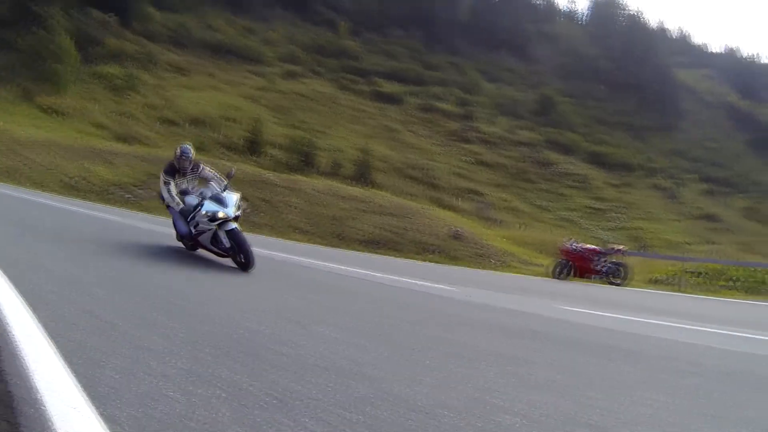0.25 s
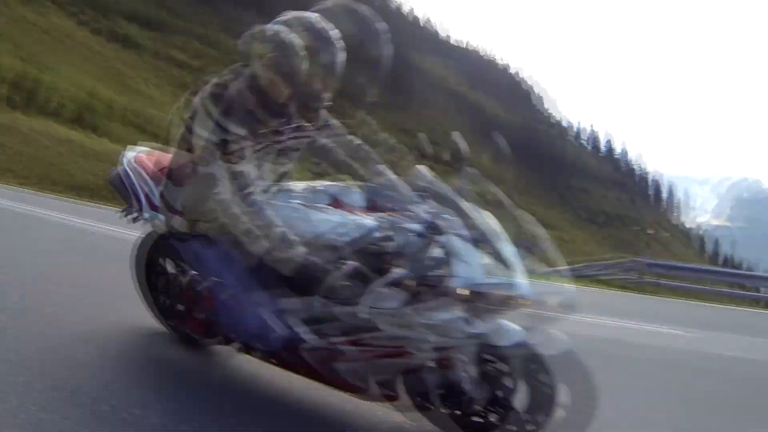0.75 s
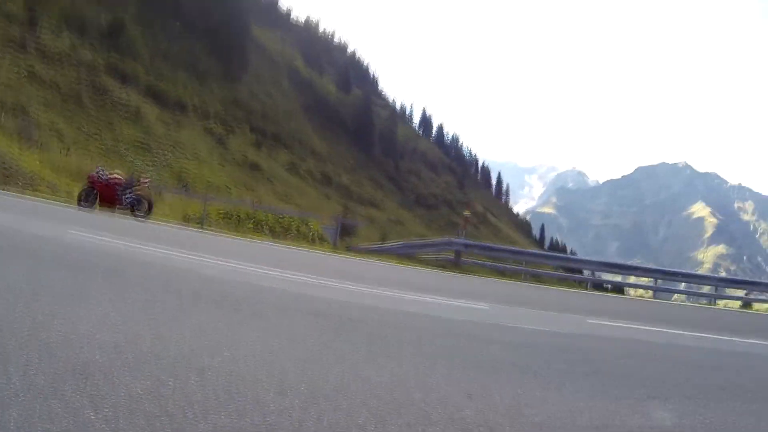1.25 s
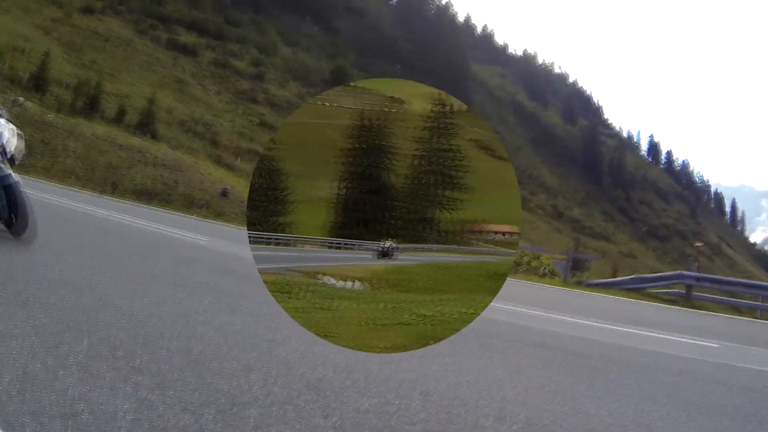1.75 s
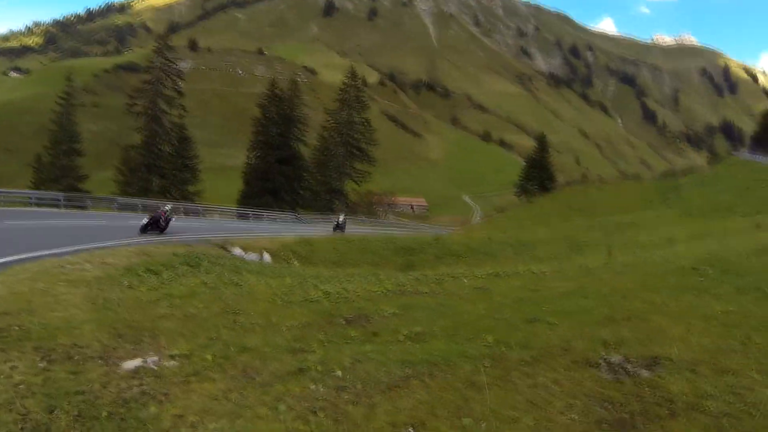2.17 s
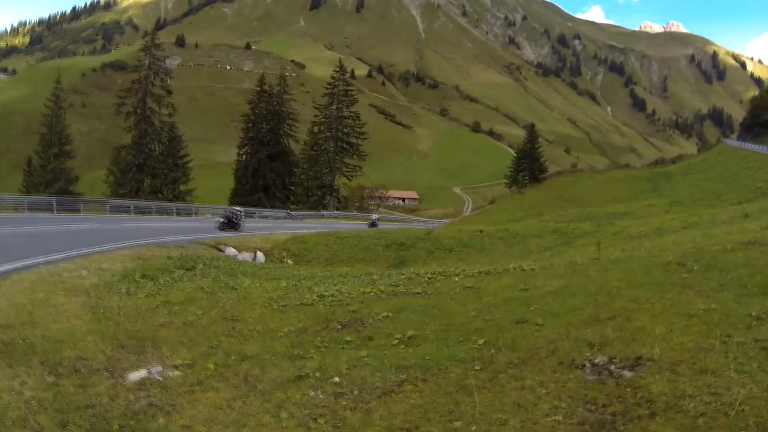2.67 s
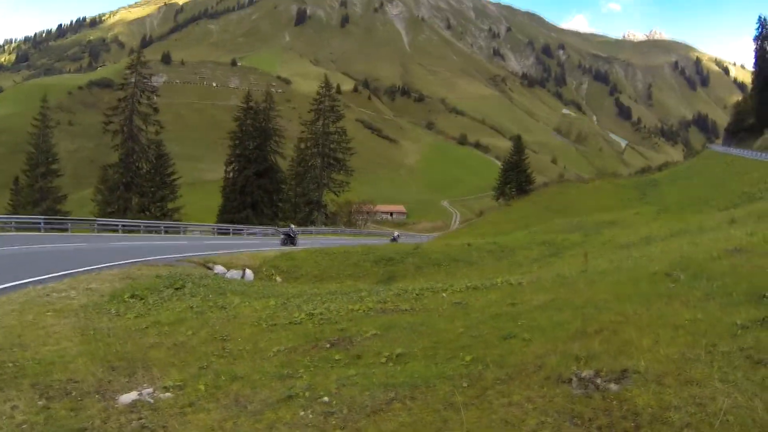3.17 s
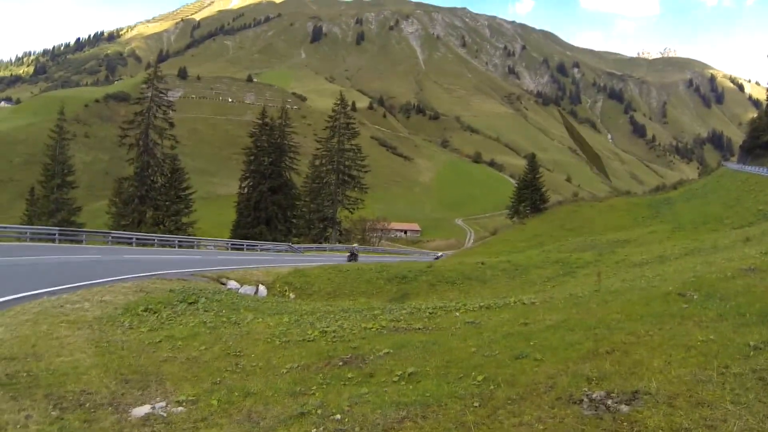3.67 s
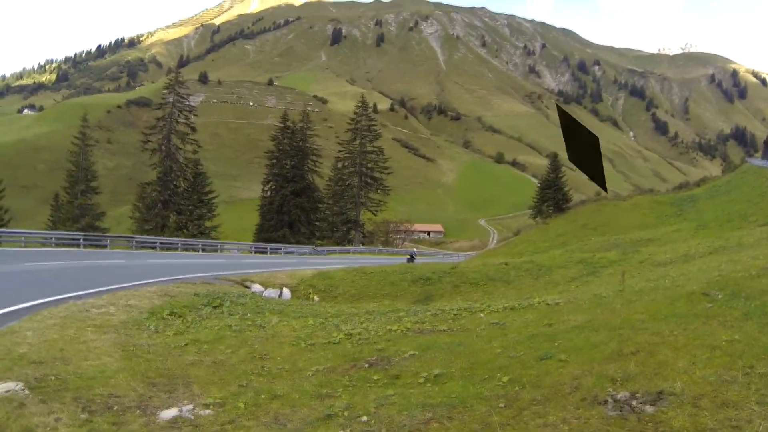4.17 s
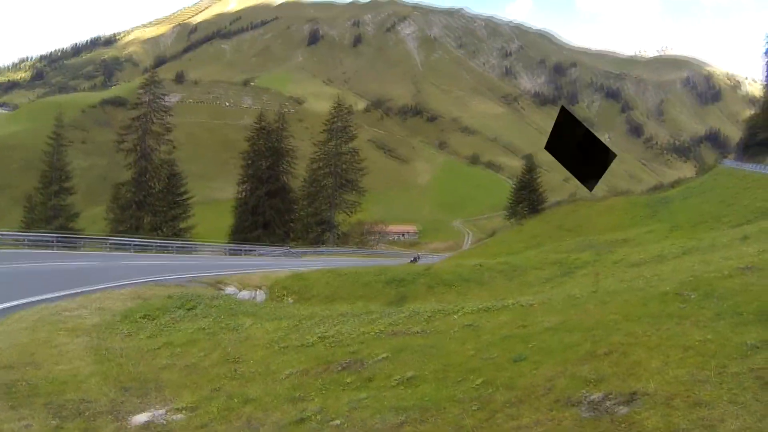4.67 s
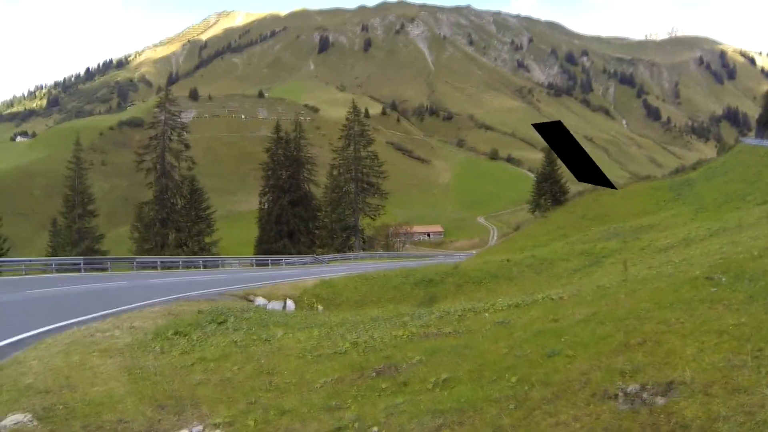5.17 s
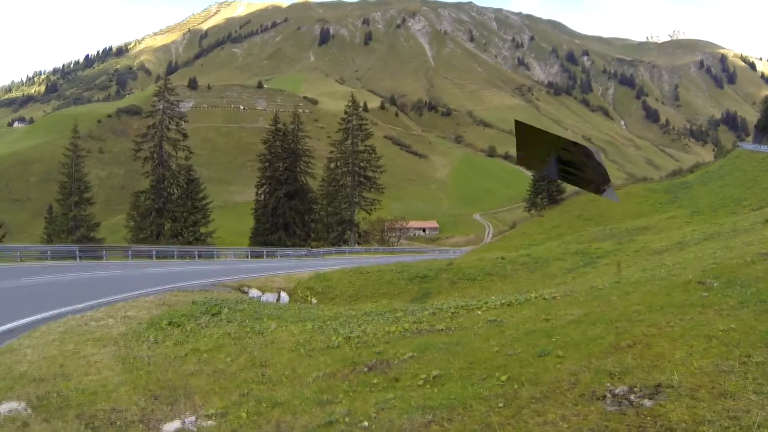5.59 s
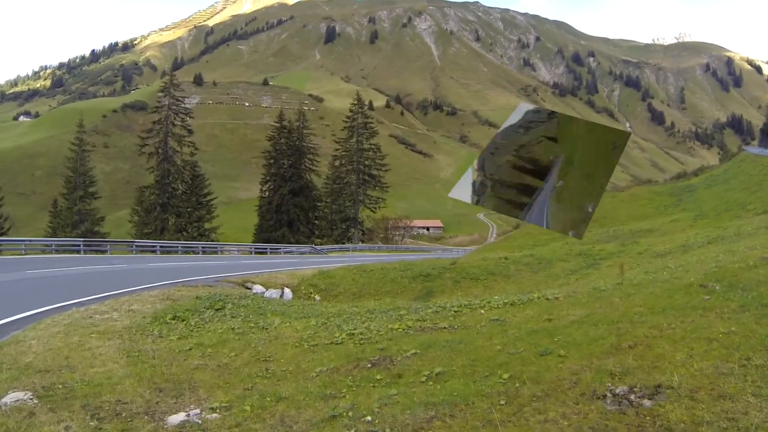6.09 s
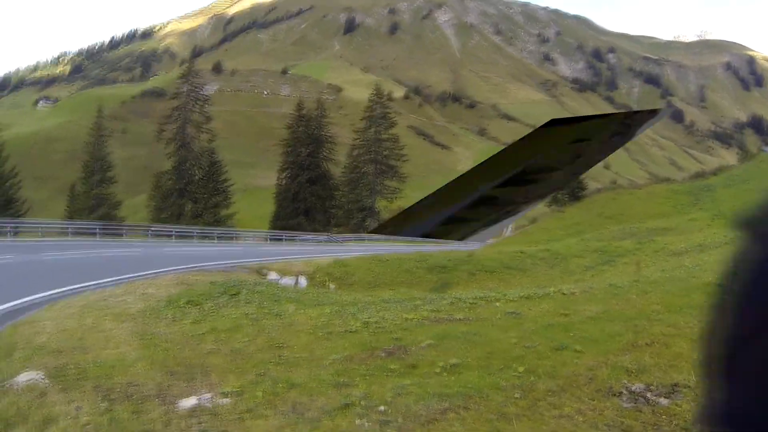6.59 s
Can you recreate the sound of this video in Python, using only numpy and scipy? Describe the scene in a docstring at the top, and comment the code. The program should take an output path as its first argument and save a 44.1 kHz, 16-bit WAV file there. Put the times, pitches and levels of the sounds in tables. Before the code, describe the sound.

Wind buffets a close, muffled outdoor microphone while uneven motorcycle exhausts approach and pass within a second. Short hissing gusts scrape over the case. After two seconds the bike accelerates away in a clean rising hum, dropping sharply in level past three seconds. Busy plastic rubs, creaks, clicks and deep thumps follow, then quiet fast camera ticking, and a final burst of loud handling.

```python
"""Two motorcycles on a mountain road

Two sport motorcycles lean past a small camera and pull away uphill: sums of firing harmonics and shaped noise.
Slow turbulent noise buffets the microphone; gusts, rubs, creaks and clicks excite the resonant plastic case.
Bumps swing the diaphragm, and faint ticks and a whistle of the camera lie over still background noise."""
import sys
import numpy as np
from scipy import signal
from scipy.fft import rfft, irfft
from scipy.io import wavfile
from scipy.ndimage import uniform_filter1d

SR = 44100
rng = np.random.default_rng(int(sys.argv[2]) if len(sys.argv) > 2 else 0)


def dump(signal):
    """Clip the signal to [-1, 1] and save it as 16-bit WAV at the path in sys.argv[1]."""
    limited = np.clip(np.atleast_2d(signal).T, -1, 1)
    pcm = np.round(limited * 32767).astype(np.int16)
    wavfile.write(sys.argv[1], SR, pcm)


N = 301644
TIME = np.arange(N) / SR  # seconds


def amp(db):
    """Logarithmic level: decibels become an amplitude gain."""
    return 10 ** (np.asarray(db) / 20)


def unit(x):
    """Power normalization: scales a signal to rms 1."""
    return x / np.sqrt(np.mean(x ** 2) + 1e-20)


def read(points, hz):
    """Spectral envelope: levels in dB are joined on a log-frequency axis."""
    point_hz, db = np.transpose(points)
    return np.interp(np.log(hz + 1), np.log(point_hz + 1), db)


def follow(rows):
    """Linear interpolation: each column after the time, at every sample."""
    s, *columns = np.transpose(rows)
    return [np.interp(TIME, s, column) for column in columns]


def add(mix, s, sound):
    """Superposition: adds a sound to the mix from time s."""
    part = mix[max(round(s * SR), 0):][:len(sound)]
    part += sound[:len(part)]


def noise(colour):
    """Spectral shaping: white noise takes the given envelope, at rms 1."""
    spectrum = rfft(rng.standard_normal(N))
    hz = np.fft.rfftfreq(N, 1 / SR)
    return unit(irfft(spectrum * amp(read(colour, hz)), N))


def wander(hz):
    """Low-pass random drift: noise of rms 1 that weakens steeply above hz."""
    spectrum = rfft(rng.standard_normal(N))
    lowpass = 1 / (1 + (np.fft.rfftfreq(N, 1 / SR) / hz) ** 4)
    return unit(irfft(spectrum * lowpass, N))


# Still background air. Each row: frequency in Hz, relative level in dB.
AIR_COLOUR = [(88, -22), (150, -5.5), (234, -11), (505, -16.5), (687, -17), (1130, -22.5), (1350, -11),
              (2180, -29.5), (2360, -23), (2750, -29), (3090, -29), (6940, -39), (7940, -34.5),
              (8580, -39.5), (15000, -42)]
AIR_DB = -59.5


def still_air():
    """Stationary ambience: steady noise with a fixed spectrum."""
    return amp(AIR_DB) * noise(AIR_COLOUR)


TICK_HZ, TICK_START_S = 30.15, 5.4655


def camera():
    """Periodic excitation: soft noise bursts swell from 4.6 to 5.4 s and stay there; a thin whistle is steady."""
    tick_s, uneven_db = .003, 1.5
    tick_db = np.interp(TIME, [4.6, 5.4], [-73, -65.5])
    age = (TIME - TICK_START_S + tick_s / 2) % (1 / TICK_HZ)
    colour = [(300, -20), (700, -7), (1050, -14), (1400, 0), (1750, -7), (2050, -3),
              (3200, -11), (7000, -28), (15000, -44)]  # (Hz, dB)
    burst = age * np.exp(-age / tick_s)
    ticks = unit(noise(colour) * burst * amp(uneven_db * wander(45)))
    whistle = np.sqrt(2) * amp(-84) * np.sin(2 * np.pi * 7672 * TIME)
    return amp(tick_db) * ticks + whistle


# Wind on the microphone. Each row: time in seconds, level in dB before the trim and the gust lift.
WIND_LEVELS = [(0, -22.5), (.4, -14.5), (.55, -18), (1.15, -19.5), (1.55, -22.5), (1.73, -9), (1.83, -21.5),
               (2.15, -19), (2.95, -25), (3.15, -22), (4.08, -22.5), (4.4, -10.5), (4.55, -20.5),
               (5.28, -28), (5.4, -32.5), (6.34, -38), (6.7, -16)]
# Spectrum of the eddies. Each row: frequency in Hz, relative level in dB.
WIND_COLOUR = [(5, 11.5), (14, 10.5), (28, 0), (45, -3.5), (70, -12), (110, -20.5), (200, -38.5),
               (350, -43), (700, -71), (1500, -86.5)]
GUST_LIFT_DB, GUST_LIFT_S = 11.5, 0.056  # swell around the strongest gust, and its half-width


def wind(trim_db=-2):
    """Turbulent pressure: slow swings at the microphone port swell around each gust."""
    eddies = noise(WIND_COLOUR)
    eddies = eddies / np.sqrt(uniform_filter1d(eddies ** 2, size=5000) + 0.025)  # evens the loudness
    strongest_db = max(row[2] for row in GUST_STROKES)
    gusting = np.zeros(N)
    for start, end, first_db, *_ in GUST_STROKES:
        middle = (start + end) / 2
        gusting += amp(first_db - strongest_db) * np.exp(-((TIME - middle) / GUST_LIFT_S) ** 2)
    return amp(follow(WIND_LEVELS)[0] + trim_db + GUST_LIFT_DB * gusting) * eddies


# Response of the case to friction and taps. Each row: frequency in Hz, relative level in dB.
CASE_RESPONSE = [(150, -8), (500, -20.5), (730, -15), (930, -18.5), (1280, 0), (1750, -3.5), (2300, -11),
                 (2800, -10), (3600, -9.5), (4300, -21.5), (5100, -18), (5750, -29), (6500, -22.5),
                 (8800, -32.5), (14500, -30)]


def case_ring(cavity_hz, cavity_db, body_db, treble_db, fizz_db, width_hz=220, size=1024):
    """Minimum-phase resonance: a causal case response whose cavity peak and brightness follow the grip."""
    hz = abs(np.fft.fftfreq(size, 1 / SR))
    db = read(CASE_RESPONSE, hz) + cavity_db / (1 + ((hz - cavity_hz) / width_hz) ** 2)
    tilt = [(750, body_db), (1200, 0), (2100, 0.0065), (3200, treble_db), (6500, treble_db),
            (10000, fizz_db), (15000, fizz_db - 6.0)]  # (Hz, dB)
    db += read(tilt, hz)
    minimum_phase = np.exp(np.conj(signal.hilbert(np.log(amp(db)))))
    return np.fft.ifft(minimum_phase).real[:size // 2]


BODY_PER_BRIGHT, FIZZ_PER_BRIGHT = 0.05, 1.25  # shares of the treble lift, dB per dB


def touched(grip, bright_db):
    """Contact stiffness: a harder contact rings the case more brightly."""
    cavity_hz, cavity_db, body_db, treble_db, fizz_db = grip
    body_db = body_db + BODY_PER_BRIGHT * bright_db
    fizz_db = fizz_db + FIZZ_PER_BRIGHT * bright_db
    return case_ring(cavity_hz, cavity_db, body_db, treble_db + bright_db, fizz_db)


def friction(rows, grip, attack_s, softness, trim_db, grain_db, slip_db, slip_hz):
    """Granular friction: tiny impacts bunched into uneven slips ring the case; longer strokes end more softly."""
    slips = slip_db * np.tanh(wander(slip_hz))
    grains = rng.standard_normal(N) * amp(grain_db * wander(2000) + slips)
    out = np.zeros(N)
    for start, end, first_db, last_db, bright_db in rows:
        release_s = softness * (end - start)
        t = TIME[(TIME > start - attack_s) & (TIME < end + release_s)]
        if len(t):
            edges = np.minimum((t - start) / attack_s, (end - t) / release_s)
            gate = np.clip(edges / 2 + .5, 0, 1)
            drive = grains[round(t[0] * SR):][:len(t)]
            stroke = signal.fftconvolve(drive, touched(grip, bright_db))[:len(t)]
            level = amp(np.interp(t, [start, end], [first_db, last_db]))
            add(out, t[0], unit(stroke) * gate * level)
    return amp(trim_db) * out


# Gusts over the case. Each row: start and end in seconds, first and last level in dB before the trim,
# brightness in dB.
GUST_STROKES = [(0.313, 0.361, -33, -36.5, -7), (0.406, 0.48, -43, -41.5, -13),
                (0.521, 0.564, -36.5, -35, -6.5), (0.603, 0.65, -44, -31, -2.5),
                (1.362, 1.408, -24.5, -43, 2), (1.455, 1.505, -35.5, -35.5, -2),
                (1.591, 1.617, -31.5, -33.5, -3.5)]
# How gusts colour the case. The values: cavity in Hz, then cavity, body, treble and fizz in dB.
GUST_GRIP = (1346, 14.3, 11.3, 2.6, 2)
PORT_HZ, PORT_Q, PORT_DB = 2800, 8.2, 9  # resonance of the microphone port


def gusts():
    """Flow-excited resonance: gusts hiss over the case and blow across the microphone port."""
    hiss = friction(GUST_STROKES, GUST_GRIP, attack_s=0.015, softness=0.23, trim_db=-1.0,
                    grain_db=-3, slip_db=2.0, slip_hz=90)
    port = signal.lfilter(*signal.iirpeak(PORT_HZ, PORT_Q, fs=SR), hiss)
    return hiss + amp(PORT_DB) * port


# Fingers sliding on the case. Each row: start and end in seconds, first and last level in dB before the trim,
# brightness in dB.
RUB_STROKES = [(2.896, 3.14, -29.5, -43.5, 3.5), (3.556, 3.661, -36, -35, 1),
               (4.146, 4.188, -30.5, -26, -0.5), (4.187, 4.22, -23.5, -28, 8.5),
               (4.243, 4.272, -28, -16, -2), (4.272, 4.295, -40, -36, -6), (4.319, 4.366, -33, -37, -5.5),
               (4.41, 4.472, -34, -35, 3), (4.495, 4.62, -32.5, -31, -2), (4.635, 4.77, -36.5, -49.5, -1.5),
               (4.835, 4.872, -31.5, -38, -8), (4.872, 4.918, -28, -41.5, 3.5),
               (4.932, 4.985, -35.5, -42, -2.5), (5.147, 5.19, -31, -37, -3),
               (5.3, 5.44, -47.5, -51.5, -2.5), (6.36, 6.392, -45, -40.5, 0), (6.472, 6.55, -35, -31.5, 2),
               (6.55, 6.665, -37.5, -38, -1), (6.689, 6.735, -45, -38, 1), (6.75, 6.842, -33, -31.5, 2.5)]
# How fingers colour the case. The values: cavity in Hz, then cavity, body, treble and fizz in dB.
RUB_GRIP = (1451, 6, 7.5, -1.5, -3.5)


def rubs():
    """Sliding friction: fingers rub the plastic in short granular strokes."""
    return friction(RUB_STROKES, RUB_GRIP, attack_s=0.0061, softness=0.22, trim_db=-3.5,
                    grain_db=2.5, slip_db=2.0, slip_hz=160)


# Plastic creaking under a tight grip. Each row: start and end in seconds, first and last drive level in dB
# before the trim, cavity in Hz, shell ring in dB relative to the case response.
CREAK_STROKES = [(4.972, 5.106, -24.5, -31, 2200, -40), (5.127, 5.148, -28, -29, 2200, -46),
                 (6.387, 6.458, -30, -14, 1605, -26)]
# How a creak colours the case. The values: cavity, body, treble and fizz in dB.
CREAK_GRIP = (9, -6, -8.5, -14)
SLIPS_PER_S, SHELL_HZ, SHELL_WIDTH_HZ = 270, 6300, 150  # mean slip rate; high mode of the shell


def creaks(trim_db=0.5, uneven=0.56, sliding=0.76, slip_length=0.43, softness=0.39):
    """Stick-slip: quick uneven jerks of the plastic ring the cavity and one high mode of the shell."""
    turns = np.cumsum(SLIPS_PER_S * (1 + uneven * wander(150))) / SR
    jerks = rng.standard_normal(N) * (sliding + np.exp(-(turns % 1) / slip_length))
    band_hz = SHELL_HZ + SHELL_WIDTH_HZ * np.array([-.5, .5])
    shell = signal.butter(2, band_hz, "bandpass", fs=SR)
    out = np.zeros(N)
    for start, end, first_db, last_db, cavity_hz, ring_db in CREAK_STROKES:
        drive = unit(jerks[round(start * SR):round(end * SR)])
        level = amp(np.linspace(first_db, last_db, len(drive)))
        drive = drive * signal.windows.tukey(len(drive), softness) * level
        case = case_ring(cavity_hz, *CREAK_GRIP)
        ring = signal.lfilter(*shell, signal.unit_impulse(len(case)))
        response = case / np.linalg.norm(case) + amp(ring_db) * ring / np.linalg.norm(ring)
        add(out, start, signal.fftconvolve(drive, response))
    return amp(trim_db) * out


# Plastic snapping and being tapped. Each row: time in seconds, peak level in dB, cavity in Hz, then body,
# treble and fizz in dB.
CLICK_EVENTS = [(2.7814, -12.5, 1440, 0.5, -10, -14), (3.5544, -10, 870, 4.5, -16, -22),
                (4.1381, -21.5, 1254, 12, 10, 10), (4.149, -18.5, 1320, 10, 0, -4),
                (4.19, -6.5, 1200, -12, -1, -9), (4.2428, -11.5, 1450, 10, -17, -18),
                (4.3473, -15.5, 1630, 4, -24, -21), (4.5947, -15.5, 1570, 13.5, -15, -9),
                (4.829, -15.5, 1350, 6, 6, -6), (5.1397, -11, 2020, -22, -17, -26),
                (5.2366, -11, 1620, -10.5, -4, -19.5), (6.3469, -14.5, 1450, 5.5, 2, -26),
                (6.392, -14.5, 1250, 5, -26, -23), (6.496, -20, 1560, -4, -20, -8),
                (6.6087, -16, 1218, 6, -11.5, -4), (6.6901, -23.5, 1360, 8, -12, -9),
                (6.7283, -23, 1480, 19, -12, -15), (6.7682, -7.5, 1230, -4, 6.5, -2),
                (6.812, 1, 1360, 4.5, 5.5, -10), (6.815, -10.5, 1470, 12, -3, -4)]
CLICK_CAVITY_DB = 9.5


def clicks(chatter=0.33, chatter_s=0.0012):
    """Impulse response: one sharp snap and a millisecond of chatter ring the case."""
    out, t = np.zeros(N), np.arange(512) / SR
    for s, peak_db, cavity_hz, *colour in CLICK_EVENTS:
        blow = (t == 0) + chatter * rng.standard_normal(len(t)) * np.exp(-t / chatter_s)
        snap = signal.fftconvolve(blow, case_ring(cavity_hz, CLICK_CAVITY_DB, *colour))
        add(out, s, amp(peak_db) * snap / abs(snap).max())
    return out


# Bumps that push air on the diaphragm. Each row: time in seconds, push in dB before its envelope,
# initial swing rate in Hz, thud peak in dB.
BUMP_EVENTS = [(0.26, -7.5, 82, -24), (0.275, -10, 37.2, -52), (2.047, -18.5, 96, -17),
               (2.896, -11.5, 64.5, -17.5), (3.554, -6, 49, -9), (4.143, -4, 36, -37),
               (4.188, -1, 42.5, -7), (4.239, -2, 34.7, -22), (4.27, -4, 25.6, -37),
               (4.597, -26, 63.5, -18), (4.879, -9, 39.4, -45), (5.128, -40, 90, -21),
               (5.242, -17.5, 25.8, -32), (6.446, -15, 60.5, -26), (6.608, -.5, 42, -15),
               (6.763, -8, 25, -40), (6.812, -16.5, 40, -35)]
THUD_S = 0.0034


def bumps(cycles=1.0, sag=0.41):
    """Damped oscillation: a dull thud and a push of air swing the diaphragm, slowing as it settles."""
    out, t = np.zeros(N), np.arange(SR // 4) / SR
    u = 2 * t / THUD_S
    thud = u ** 2 * (1 - u / 3) * np.exp(-u)
    for s, push_db, hz, thud_db in BUMP_EVENTS:
        swings = np.log1p(sag * hz * t) / sag  # cycles elapsed, ever more slowly
        envelope = np.exp(-(swings / cycles) ** 2) * (1 - np.exp(-t / THUD_S))
        push = np.sin(2 * np.pi * swings) * envelope
        add(out, s, amp(push_db) * push + amp(thud_db) * thud / thud.max())
    return out


PULL_START_S, PULL_END_S, THROTTLE_S = 2.0, 3.15, 0.14  # pull uphill, and length of each transition


def throttle():
    """Control ramps: how far the rider has opened up, and how far the bike has gone round the hill, 0 to 1."""
    return [np.clip((TIME - s) / THROTTLE_S + .5, 0, 1) for s in (PULL_START_S, PULL_END_S)]


# Spectrum of the tyre and intake noise. Each row: frequency in Hz, relative level in dB.
RUSH_COLOUR = [(180, -27), (300, -21), (331, -12), (377, -42), (532, -5), (801, -5), (959, -12.5),
               (1440, 7), (1970, -9), (3730, -7), (4250, -16.5), (5350, -15), (7920, -29.5), (13600, -33.5),
               (15000, -63)]
# A thin sizzle behind the bikes that stops short. Each row: time in seconds, level in dB.
SIZZLE_LEVELS = [(1.5, -64), (1.7, -56.5), (1.85, -53.5), (1.95, -50), (1.965, -77)]
# Spectrum of the sizzle. Each row: frequency in Hz, relative level in dB.
SIZZLE_COLOUR = [(2000, -29), (3000, 1.5), (3800, 7.5), (4400, -10), (5500, -12), (6300, 3), (7300, -11),
                 (9000, -29), (15000, -51)]
# Level at the closest point, its time, and the time to travel that distance.
RUSH_DB, CLOSEST_S, PASSING_S = -40.5, .8, 0.2


def rush(throb=0.042, flicker_db=1.5, second_bike_db=2, pull_db_per_s=5):
    """Inverse-distance law: tyre and intake noise fades with range, builds in the pull, swells with the sizzle."""
    firing = np.cos(2 * np.pi * np.cumsum(follow(NEAR_BIKE)[0]) / SR)
    sizzle = amp(follow(SIZZLE_LEVELS)[0])
    pulling, gone = throttle()
    pull_db = pull_db_per_s * (TIME - PULL_START_S) * (pulling - gone)
    passing = amp(RUSH_DB + pull_db) / np.hypot(1, (TIME - CLOSEST_S) / PASSING_S)
    level = np.hypot(passing, amp(second_bike_db) * sizzle)  # the powers add
    tyres = level * amp(flicker_db * wander(30)) * noise(RUSH_COLOUR)
    return (1 + throb * firing) * (tyres + sizzle * noise(SIZZLE_COLOUR))


# Gear whine, one list per whine. Each row: time in seconds, frequency in Hz, level in dB.
GEAR_WHINES = [
    [(1.1, 1603, -56), (1.2, 1695, -47.5), (1.3, 1781, -84), (1.36, 1720, -60)],
    [(2.1, 1608, -67), (2.25, 1648, -51), (2.4, 1718, -55), (2.58, 1796, -53), (2.68, 1804, -57),
     (2.78, 1930, -64)],
]


def gears():
    """Gear-mesh tone: random frequency modulation makes each gliding whine fuzzy."""
    jitter, flutter_hz = .014, 90
    out = np.zeros(N)
    for rows in GEAR_WHINES:
        hz, db = follow(rows)
        sounding = (TIME > rows[0][0]) & (TIME < rows[-1][0])
        turns = np.cumsum(hz * (1 + jitter * wander(flutter_hz))) / SR
        out += sounding * np.sqrt(2) * amp(db) * np.sin(2 * np.pi * turns)
    return out


def clatter(level_db=-50, closest_s=0.88, passing_s=0.16, knock=1.0):
    """Inverse-square weighting: engine block and airbox rattle at each firing, loudest as the bike sweeps by."""
    turns = np.cumsum(follow(NEAR_BIKE)[0]) / SR
    block = noise([(200, -35), (330, 2), (385, -30), (440, 13), (560, 32.5), (660, -18), (820, -10),
                   (1000, -46), (1600, 3), (2300, 20), (3200, 22.5), (6000, -53)])  # (Hz, dB)
    nearness = 1 / (1 + ((TIME - closest_s) / passing_s) ** 2)
    rattle = block * (knock + np.exp(-4 * (turns % 1)))
    return amp(level_db) * nearness * unit(rattle)


def exhaust_roar(relative_db=-5):
    """Turbulent jet noise: gas in the near bike's silencer roars most when it fires roughly."""
    _, db, rough = near_bike()
    colour = [(50, -14), (90, 11.5), (130, 9.0), (165, 13.0), (220, 10.5), (290, -11.0),
              (450, -4.5), (900, -36), (2000, -69)]  # (Hz, dB)
    return amp(db + relative_db) * rough * noise(colour)


def engine(hz, db, rough, orders, jitter, flutter_hz, lope, far_db=-42, dulling=1.0, count=24):
    """Harmonic series: exhaust orders, duller when faint; uneven firing lopes and shakes pitch and strength."""
    turns = np.cumsum(hz * (1 + jitter * rough * wander(flutter_hz))) / SR
    shakes = [wander(flutter_hz) for _ in range(4)]
    slope_db = dulling * np.minimum(db - far_db, 0)  # per octave
    out = np.zeros(N)
    for k in range(1, count + 1):
        phase, cycle_phase = rng.random(2)
        loping = lope * np.sin(2 * np.pi * (turns / 7 + cycle_phase))  # once in seven firings
        uneven = loping + .7 * shakes[k % len(shakes)]
        order_level = amp(read(orders, k) + slope_db * np.log2(k))
        strength = order_level * (1 + rough * np.sqrt(k) * uneven)
        out += strength * np.sin(2 * np.pi * (k * turns + phase))
    return np.sqrt(2) * amp(db) * out


# The other bike. Each row: time in seconds, mean firing rate in Hz, level in dB before the orders.
FAR_BIKE = [(0, 98.94, -40.5), (.6, 98, -34), (1.3, 92.5, -42.5), (1.7, 93, -35), (1.95, 98.8, -31),
            (2.4, 100.1, -103)]
# Its exhaust orders. Each row: multiple of the firing rate, relative level in dB.
FAR_ORDERS = [(1, -10.5), (2, -15.5), (3, -27), (5, -36), (9, -46.5)]
ROUGH_FAR = 0.468


def far_engine():
    """Constant irregularity: the other bike fires with one steady degree of roughness."""
    return engine(*follow(FAR_BIKE), ROUGH_FAR, FAR_ORDERS, jitter=0.0169, flutter_hz=8.9, lope=0.51)


# The near bike, Doppler shift included. Each row: time in seconds, mean firing rate in Hz,
# level in dB before the orders.
NEAR_BIKE = [(0, 115.5, -44.5), (.68, 112, -40.5), (.88, 106.9, -31), (1.1, 110.1, -33),
             (1.3, 108.5, -35.5), (1.7, 114.4, -36), (1.95, 113.8, -32.5), (2.3, 126.3, -36),
             (2.58, 135.1, -34.5), (3.02, 143.3, -38), (3.2, 145.1, -53.5), (3.65, 152, -49),
             (4.05, 142.5, -50), (4.3, 146, -45.5), (4.8, 154.1, -51.5), (5.5, 151, -59.5),
             (6.84, 156.3, -57)]
# It fires unevenly through the bend, cleanly while pulling uphill, and blurs in the distance.
ROUGH_BEND, ROUGH_PULL, ROUGH_DISTANT = 0.66, 0.056, 0.47


def near_bike():
    """Load-dependent combustion: firing rate, level and roughness, which the throttle ramps set."""
    pulling, gone = throttle()
    rough = ROUGH_BEND + (ROUGH_PULL - ROUGH_BEND) * pulling + (ROUGH_DISTANT - ROUGH_PULL) * gone
    return *follow(NEAR_BIKE), rough


# Exhaust orders of the near bike. Each row: multiple of the firing rate, relative level in dB.
NEAR_ORDERS = [(1, -3.5), (2, -17), (3, -27.5), (4, -35), (5, -39), (7, -47), (9, -43.5), (12, -29.5),
               (16, -37), (24, -52)]


def near_engine():
    """Doppler-shifted harmonics: the near bike's exhaust follows its firing rate and roughness."""
    return engine(*near_bike(), NEAR_ORDERS, jitter=0.0179, flutter_hz=13.7, lope=1.0)


def scene():
    """Linear superposition: bikes, weather, handling and camera noise add at one microphone."""
    weather = wind() + still_air() + gusts()
    handling = rubs() + creaks() + clicks() + bumps()
    bikes = far_engine() + near_engine() + exhaust_roar() + clatter() + gears() + rush()
    opening = np.minimum(TIME / .005, 1)  # brief fade-in
    return (opening * (weather + camera() + handling + bikes))[None]


def record(dry):
    """Transducer limits: the camera blocks steady pressure, rounds off large swings and limits the band."""
    coupled = signal.lfilter(*signal.butter(1, 6, "highpass", fs=SR), dry)
    rounded = coupled / (1 + (coupled / .97) ** 8) ** (1 / 8)
    lowpass = signal.firwin(511, 15300, window=("kaiser", 9), fs=SR)
    return signal.oaconvolve(rounded, lowpass[None], "same")


dry = scene()
out = record(dry)
dump(out)
```